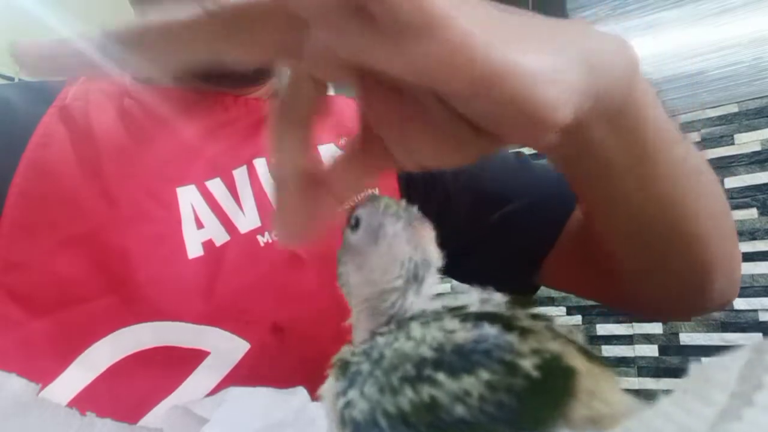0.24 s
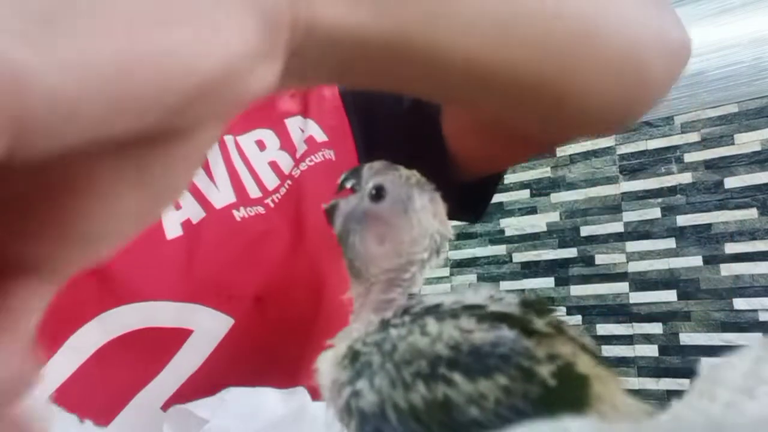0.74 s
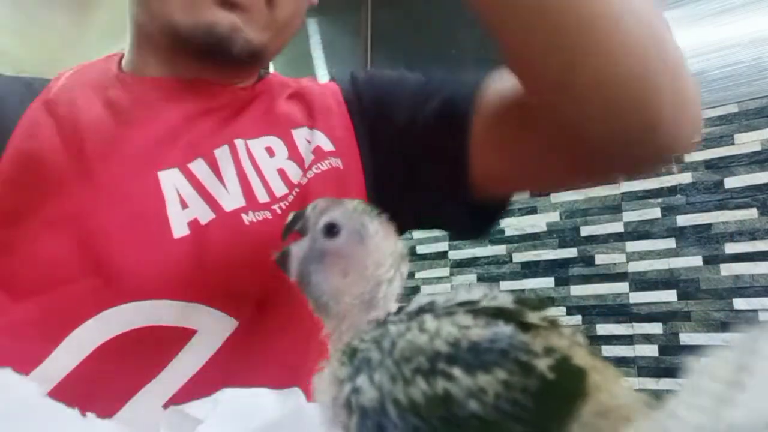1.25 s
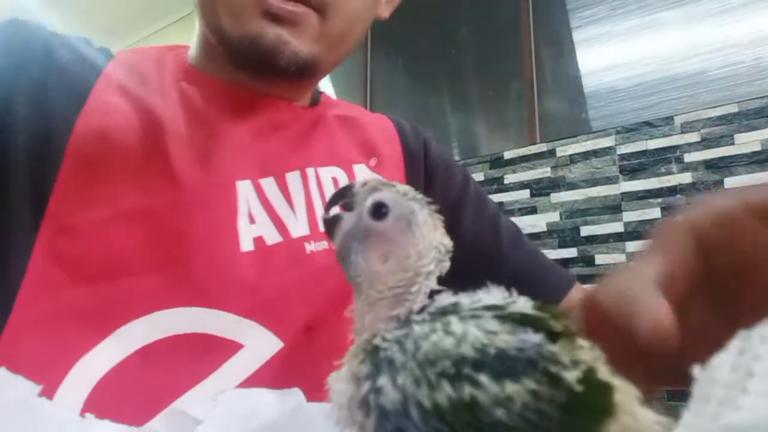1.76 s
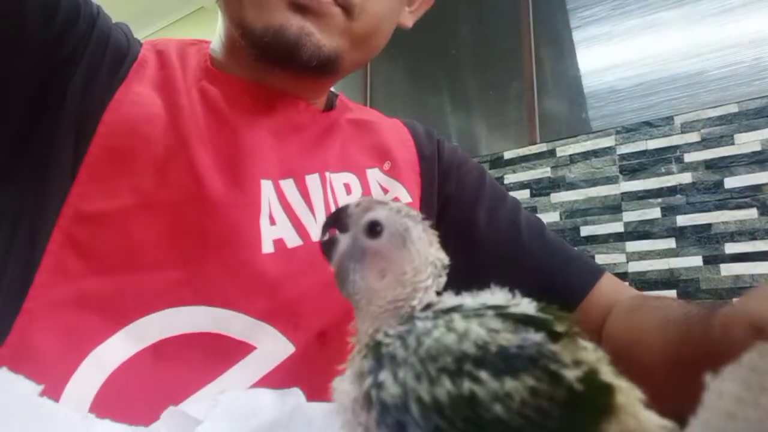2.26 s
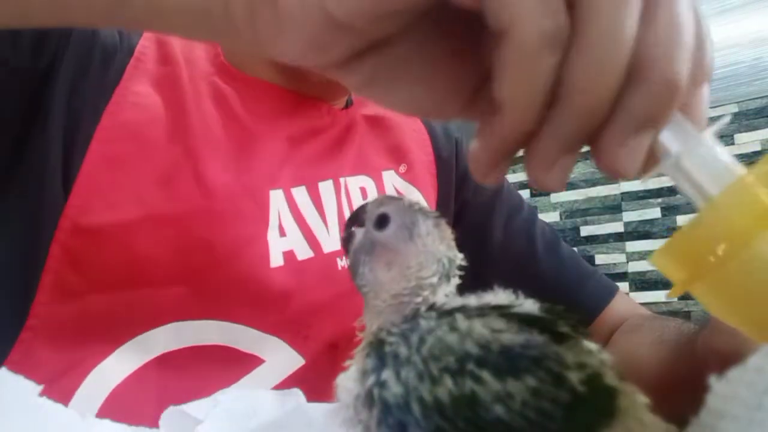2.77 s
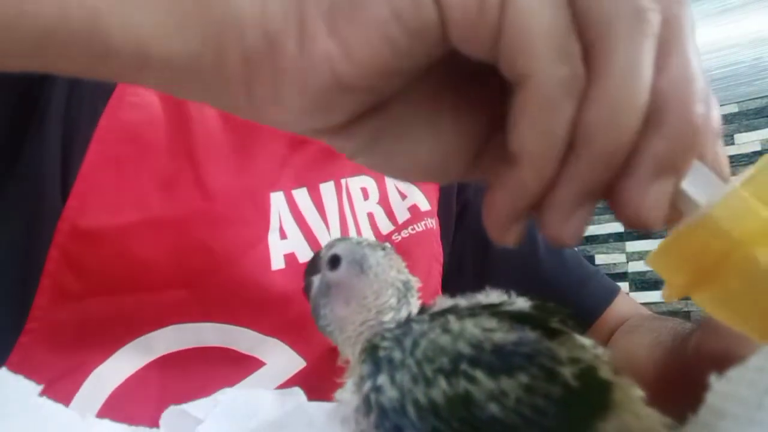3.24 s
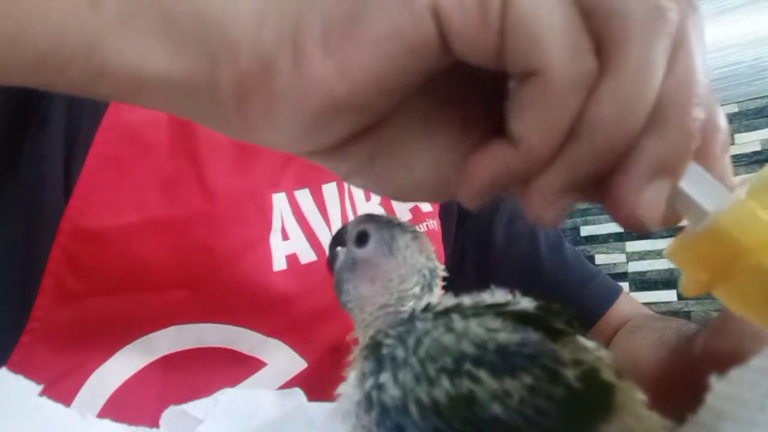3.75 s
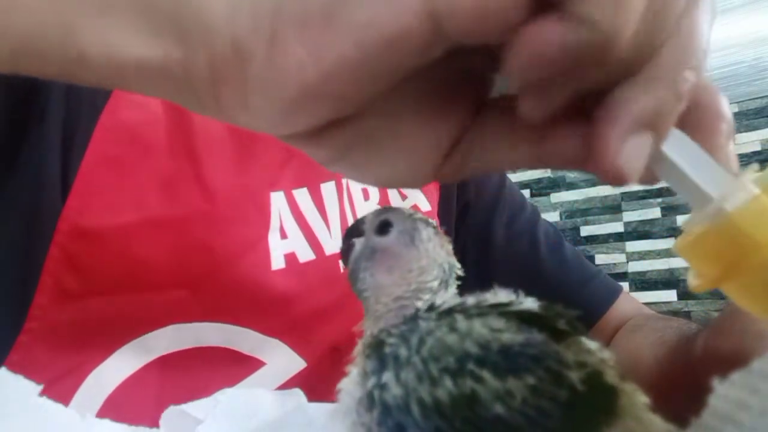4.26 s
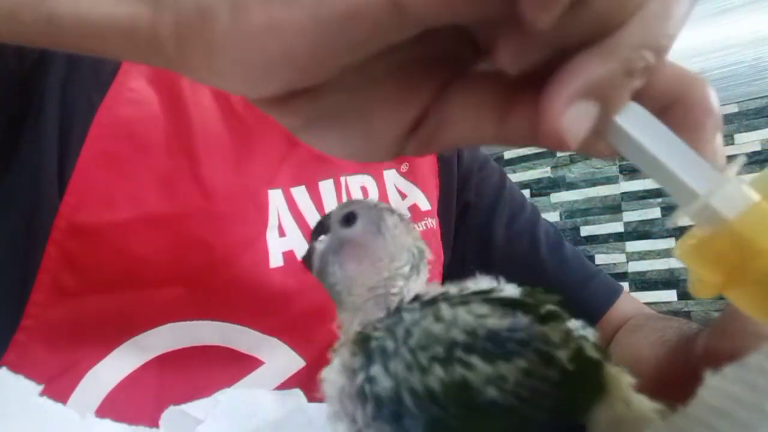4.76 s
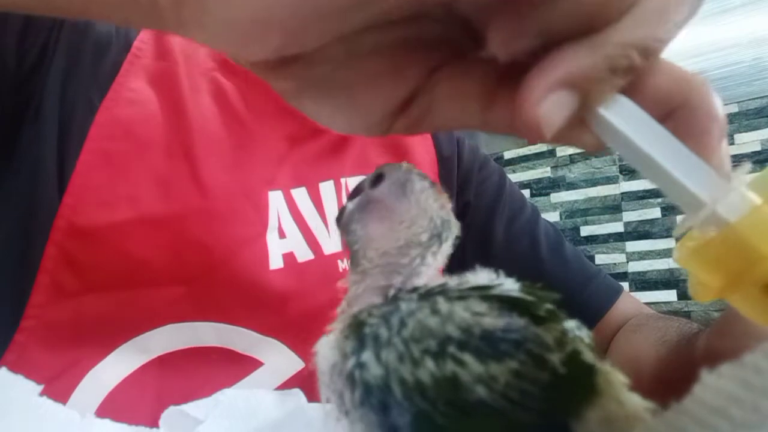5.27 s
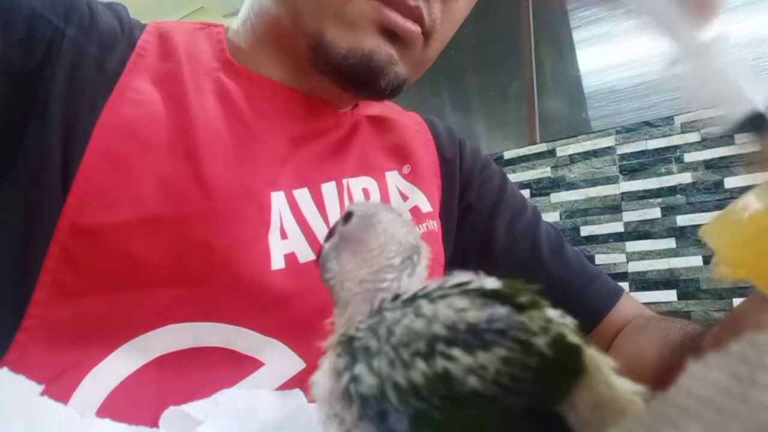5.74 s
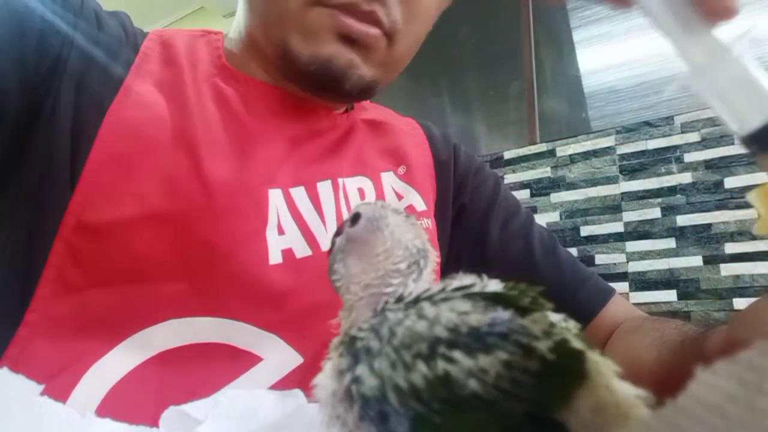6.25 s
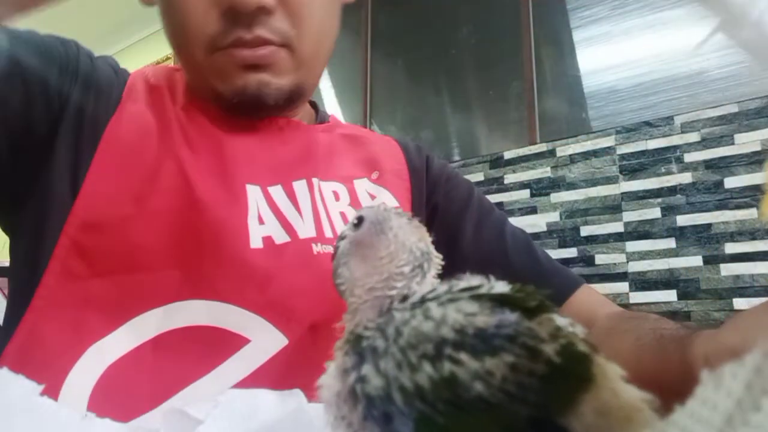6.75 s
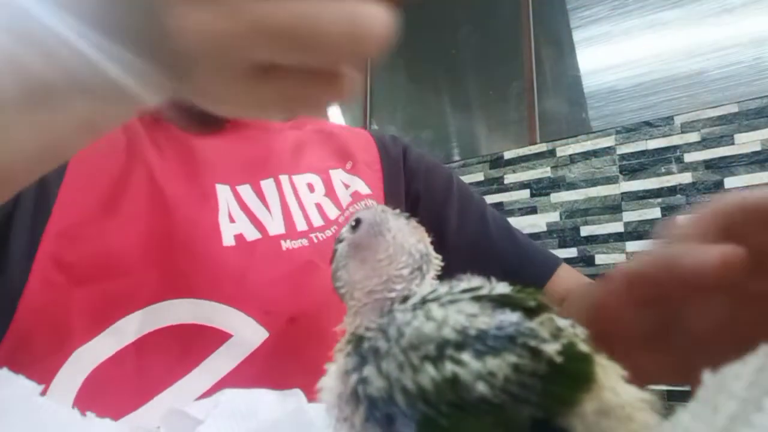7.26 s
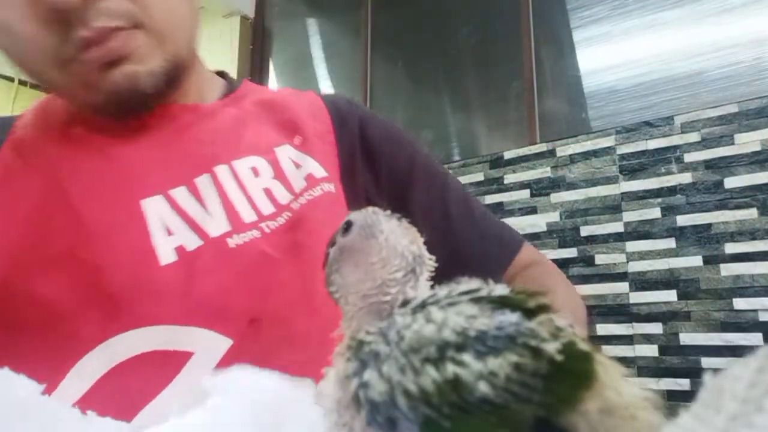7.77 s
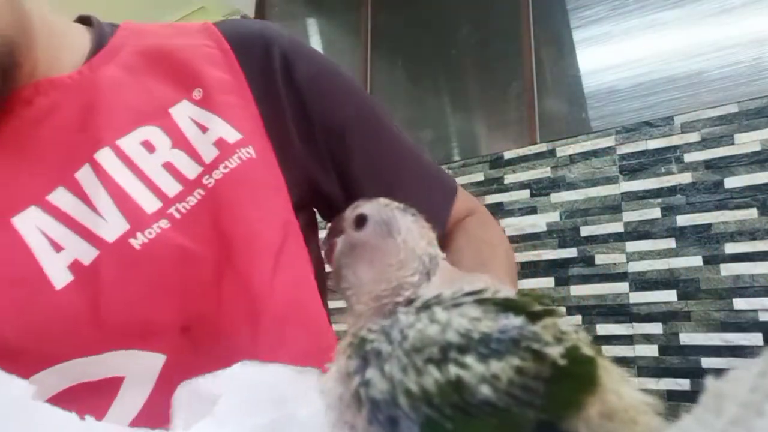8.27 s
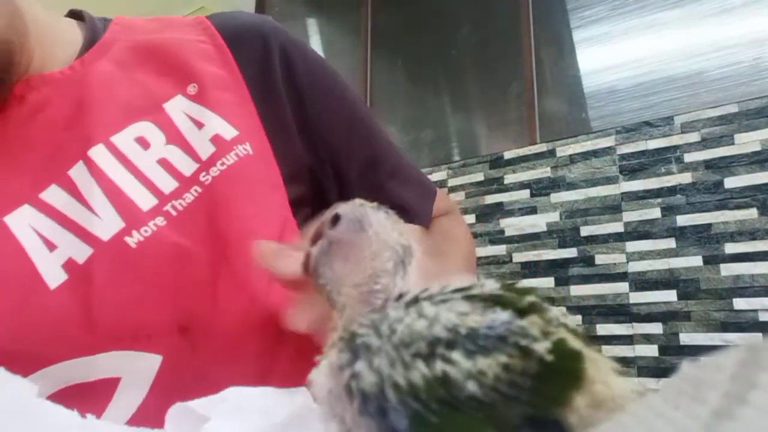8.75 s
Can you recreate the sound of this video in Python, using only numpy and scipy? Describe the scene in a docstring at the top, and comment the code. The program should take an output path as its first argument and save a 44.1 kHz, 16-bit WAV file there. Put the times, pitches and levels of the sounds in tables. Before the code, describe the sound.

Rapid, harsh, pulsing chick chirps come in bursts in a tiled room, answered by quick mouth clucks over soft hiss and faint cloth rustle.

```python
"""Under soft room noise and faint far tones, a parrot chick begs close to the microphone in a tiled room:
first a bout of fast, raspy chirps, each a trill of swooping pips with a thin squeak now and then.
After a pause with one tongue cluck from the keeper comes a second bout, then a run of clucks, then a short
third bout. Most chirps end on a falling note. Cloth, feathers and hands brush softly in between, and the
recorder's gain control ducks the room noise under loud sounds."""
import sys
import numpy as np
from scipy import signal
from scipy.fft import rfft, irfft, next_fast_len
from scipy.io import wavfile
from scipy.ndimage import uniform_filter1d

SR = 44100
rng = np.random.default_rng(int(sys.argv[2]) if len(sys.argv) > 2 else 0)


def pcm_store(signal):
    """Save signal as 16-bit PCM."""
    levels = np.round(np.clip(np.atleast_2d(signal), -1, 1) * 32767)
    wavfile.write(sys.argv[1], SR, levels.astype(np.int16).T)


N = 397336
T = np.arange(N) / SR


def from_db(db):
    """Decibels to gain."""
    return 10 ** (np.asarray(db) / 20)


def rms_one(x):
    """Scale to unit rms."""
    return x / np.sqrt(np.mean(x ** 2) + 1e-20)


def at_hz(points, hz, axis=1):
    """Read a column of a table on a log-frequency axis."""
    points = np.array(points)
    return np.interp(np.log(np.maximum(hz, 1)), np.log(points[:, 0]), points[:, axis])


def wander(rate, size):
    """Random curve around 0: normal draws of spread 1, `rate` a second, joined by straight lines."""
    place = np.arange(size) * rate / SR
    count = int(place[-1]) + 2
    return np.interp(place, np.arange(count), rng.standard_normal(count))


def band(x, low_hz, high_hz):
    """Band-pass, second-order on each side."""
    edges = [low_hz, min(high_hz, SR / 2 - 10)]
    return signal.sosfilt(signal.butter(2, edges, "band", fs=SR, output="sos"), x)


def high_pass(x, hz):
    """Fourth-order high-pass."""
    return signal.sosfilt(signal.butter(4, hz, "high", fs=SR, output="sos"), x)


def resonate(x, hz, width_hz):
    """One resonance that keeps the power of white noise."""
    r = np.exp(-np.pi * width_hz / SR)
    feed = np.array([1, 0, -1]) * np.sqrt((1 - r * r) / 2)
    return signal.lfilter(feed, [1, -2 * r * np.cos(2 * np.pi * hz / SR), r * r], x)


def coloured(spectrum, size):
    """Noise of a given spectrum, rms 1."""
    hz = np.arange(size // 2 + 1) * SR / size
    white = rfft(rng.standard_normal(size))
    return rms_one(irfft(white * from_db(at_hz(spectrum, hz)), size))


def add(out, s, sound):
    """Mix a sound in at time s."""
    start = round(s * SR)
    part = sound[max(-start, 0):max(N - start, 0)]
    out[max(start, 0):max(start, 0) + len(part)] += part


# spectral shape of the room's air noise: (f/Hz, relative level/dB per Hz)
AIR_SPECTRUM = [(25, -18), (70, -8), (140, -6.5), (320, -11), (414, -13.5), (527, 2.5), (900, 2),
                (1300, 4.5), (1700, -1.5), (2300, -5), (3400, -10.5), (5000, -11), (6400, -6.5),
                (8700, -19), (12000, -23.5), (15800, -23.5)]
# swells of the low rumble: (t/s, level/dB)
RUMBLE_LEVEL = [(0, -63), (1.9, -63), (2.5, -81), (3.3, -66), (4.1, -62.5), (5.2, -67), (9, -75)]
AIR_LOW_DB, AIR_HIGH_DB = -47, -43.5   # rms of the air noise below and above about 2 kHz
FIZZ_FLICKER_DB, FIZZ_TURNS_PER_S = 3, 12   # flicker of the top octave; turns of all the upper octaves


def room_noise(patchy_db=1.8):
    """Soft air noise over a low rumble; each octave swells a little on its own, and the noise above about 8 kHz
    flickers."""
    size = next_fast_len(N, True)
    spectrum = rfft(coloured(AIR_SPECTRUM, size))
    hz = np.arange(size // 2 + 1) * SR / size
    dull, bright = 0, 0
    for centre in 90 * 2 ** np.arange(8):
        # neighbouring octaves crossfade into each other
        share = np.maximum(1 - np.abs(np.log2(np.clip(hz, 90, 11520) / centre)), 0)
        octave = irfft(spectrum * share, size)[:N]
        if centre < 2000:
            dull += octave * from_db(patchy_db * wander(14, N))
        else:
            flicker_db = FIZZ_FLICKER_DB if centre > 8000 else 1.1
            bright += octave * from_db(flicker_db * wander(FIZZ_TURNS_PER_S, N))
    air = from_db(AIR_LOW_DB) * rms_one(dull) + from_db(AIR_HIGH_DB) * rms_one(bright)
    drone = rms_one(band(rng.standard_normal(N), 60, 98))
    return air + from_db(np.interp(T, *np.transpose(RUMBLE_LEVEL))) * drone


# faint far tones: (middle t/s, length/s, f/Hz, peak level/dB)
DISTANT_TONES = [(.36, 0.48, 1124, -48.5), (1.535, 0.38, 1109, -49.5), (4.38, .14, 1760, -52),
                 (7.788, 0.48, 986, -48)]


def far_tones():
    """Thin, slightly wavering sine tones that come and go in the distance."""
    out = np.zeros(N)
    waver_hz = 5 * wander(30, N)
    for s, length, hz, db in DISTANT_TONES:
        swell = np.exp(-(2 * (T - s) / length) ** 4)
        out += from_db(db) * swell * np.sin(2 * np.pi * np.cumsum(hz + waver_hz) / SR)
    return out


# the clearest brushes of cloth, feathers and hands: (middle t/s, length/s, level/dB, centre f/Hz)
CLEAR_BRUSHES = [(.1, 0.43, -54, 546), (1.95, 0.23, -47, 1980), (2.15, 0.11, -54, 437),
                 (2.67, 0.02, -46.5, 602), (2.83, 0.22, -56.5, 303), (3.023, 0.013, -42, 764),
                 (3.072, 0.12, -42, 5800), (3.69, 0.089, -55, 208), (4.2, 0.15, -50, 1850),
                 (4.95, 0.57, -56, 420), (5.82, 0.46, -54.5, 273), (6.96, 0.097, -39.5, 376),
                 (7.18, 0.24, -56, 154), (7.349, 0.25, -50.5, 497), (8.03, 0.53, -52, 585),
                 (8.278, 0.2, -53, 355), (7.92, 0.054, -49, 890), (8.273, 0.082, -43, 6000),
                 (8.42, 0.4, -45, 1810)]
# level of the keeper's softly stirring sleeves: (t/s, level/dB)
SLEEVE_LEVEL = [(0, -84), (1.4, -67.5), (2.9, -66), (4.2, -60), (5.2, -60.5), (7.1, -55), (7.7, -69),
                (8.4, -60.5), (9, -61.5)]
STIRS_PER_S, STIR_S = 14, 0.12   # rate; mean length of one stir
STIR_LOW_HZ, STIR_HIGH_HZ = 169.5, 520   # range of their centres


def rustles(spread=1.157):
    """Grainy brushes, each a short swell of narrow noise: some clear ones over a random low stirring."""
    out, t = np.zeros(N), T[:SR] - .5
    brushes = list(CLEAR_BRUSHES)
    for k, (when, long, high) in enumerate(rng.random((int(STIRS_PER_S * N / SR), 3))):
        s = (k + when) / STIRS_PER_S
        db = np.interp(s, *np.transpose(SLEEVE_LEVEL))
        centre_hz = STIR_LOW_HZ * (STIR_HIGH_HZ / STIR_LOW_HZ) ** high
        brushes.append((s, STIR_S * (.5 + long), db, centre_hz))
    for s, length, db, hz in brushes:
        grain = from_db(2.5 * wander(120, SR))
        brush = rms_one(grain * band(rng.standard_normal(SR), hz / spread, hz * spread))
        add(out, s + t[0], from_db(db) * np.exp(-(2 * t / length) ** 2) * brush)
    return out


# near surfaces: (delay t/s, gain as a share of the direct sound)
NEAR_SURFACES = [(.0036, 0.015), (.0062, 0.013), (0.012, .2)]
# reverberant tail: (f/Hz, level/dB, t60/s)
REVERB = [(191, 30, 1), (394, -2, 0.45), (605, -8, 0.24), (860, -20.5, 0.18), (1690, -19, 1),
          (2280, -17.5, 1), (2800, -20, 0.8), (3340, -20, 0.47), (3700, -12, 0.37), (3990, -15.5, .7),
          (4280, -7.5, 0.73), (4520, -11.5, 0.41), (4930, -14.5, 0.58), (5660, -0.5, 0.23),
          (5900, -9.5, 0.76), (7300, -5, 0.27), (9200, -10, 0.33), (13160, -13, 0.31)]


def room(x, gap_s=0.0023):
    """A few near echoes, and a diffuse tail that builds up after a short gap and dies band by band."""
    t = T[:SR]
    response, edges = np.zeros(SR), np.geomspace(140, 17000, 60)
    for low, high in zip(edges, edges[1:]):
        hz = np.sqrt(low * high)
        decay = from_db(-60 * t / at_hz(REVERB, hz, axis=2)) * (1 - np.exp(-(t / gap_s) ** 2))
        decay /= np.sqrt(np.sum(decay ** 2))
        response += from_db(at_hz(REVERB, hz)) * band(rng.standard_normal(SR), low, high) * decay
    for delay, share in NEAR_SURFACES:
        response[round(delay * SR)] += share
    return x + signal.fftconvolve(x, response)[:N]


# a hollow object nearby: (f/Hz, t60/s, gain at resonance as level/dB)
HOLLOW_OBJECT = (382, 0.2, 21.3)


def sympathetic(x):
    """One narrow resonance, set going by the low part of the keeper's clucks and their echoes."""
    hz, t60, db = HOLLOW_OBJECT
    r = from_db(-60 / (t60 * SR))
    feed = np.array([1, 0, -1]) * (1 - r * r) / 2   # unit gain at the peak
    return from_db(db) * signal.lfilter(feed, [1, -2 * r * np.cos(2 * np.pi * hz / SR), r * r], x)


# tongue clucks: (t/s, level/dB, mouth resonance f/Hz midway through its fall,
# hollow low resonance level/dB, upper resonance level/dB, both relative to the mouth, rise/s)
TONGUE_CLUCKS = [(2.515, -11.5, 790, -32, -39, 0.0019), (5.657, -16, 880, -2.5, -26, 0.00089),
                 (5.819, -3.5, 940, -4.5, -24, 0.0013), (5.957, 1.5, 982, -5, -30, 0.0013),
                 (6.091, 0, 974, -4, -35, 0.0013), (6.2167, -2.5, 978, -3.5, -40, 0.0016),
                 (6.3637, 1, 772, -12, -38, 0.0018), (6.5085, 1.5, 780, -8, -39, 0.0015),
                 (6.662, 2, 777, -8, -34, 0.0013), (6.801, 0, 765, -2.5, -39, 0.0014),
                 (6.934, -15.5, 734, 1, -30, 0.0035)]
# ring time of a mouth resonance at MOUTH_HZ; power by which a lower one rings longer
MOUTH_T60_S, MOUTH_HZ, MOUTH_DAMPING = 0.023, 940, 1.2
UPPER_MOUTH_HZ, UPPER_MOUTH_T60_S = 2850, 0.049   # this resonance stays put
SNAP_DB = -23   # snap of the tongue, relative to the ring


def clucks(sag=0.1, low_ratio=0.82, low_t60=0.022, edge_ratio=0.48):
    """The tongue snaps off the palate; three mouth resonances ring, the lower two sinking as it opens."""
    out, t = np.zeros(N), T[:SR // 10]
    for s, level_db, hz, hollow_db, upper_db, rise_s in TONGUE_CLUCKS:
        t60 = MOUTH_T60_S * (MOUTH_HZ / hz) ** MOUTH_DAMPING
        sinking_hz = hz * (1 + sag * (2 * np.exp(-t / 0.0067) - 1))
        phase = 2 * np.pi * np.cumsum(sinking_hz) / SR
        ring = np.sin(phase) * from_db(-60 * t / t60)
        ring += np.cos(low_ratio * phase) * from_db(hollow_db - 60 * t / low_t60)
        ring += np.sin(2 * np.pi * UPPER_MOUTH_HZ * t) * from_db(upper_db - 60 * t / UPPER_MOUTH_T60_S)
        snap = rms_one(band(rng.standard_normal(len(t)), 530, 4500)) * np.exp(-t / 0.004)
        cluck = ring * (1 - np.exp(-(t / rise_s) ** 2)) + from_db(SNAP_DB) * snap
        add(out, s, from_db(level_db) * high_pass(cluck, edge_ratio * hz))
    return out


# walls that throw the clucks back: (delay t/s, level/dB)
CLUCK_WALLS = [(.0098, -10), (.05, -25.5)]


def thrown_back(direct):
    """The direct sound plus one delayed, softer copy from each wall."""
    out = direct.copy()
    for delay, db in CLUCK_WALLS:
        add(out, delay, from_db(db) * direct)
    return out


# thin, pure squeaks between pips: (middle t/s, level/dB, f/Hz, half-length/s)
THIN_SQUEAKS = [(0.376, -19, 3850, 0.0045), (.381, -9, 7100, 0.0012), (.441, -5.5, 7040, 0.0012),
                (.483, -15, 5950, 0.0018), (0.504, -11, 5220, 0.0021), (0.726, -15, 5750, 0.0047),
                (0.868, -11.5, 6000, 0.0025), (0.903, -15, 5920, 0.0072), (1.099, -13, 4140, 0.0027),
                (1.135, -16, 4000, 0.0026), (4.467, -14, 7100, 0.0022), (4.477, -14, 6960, .002),
                (5.011, -16, 5770, 0.0025), (5.469, -10, 6350, 0.0052), (5.596, -15, 5850, 0.0027),
                (5.614, -15, 6070, 0.0054), (8.683, -10, 4500, 0.0027), (8.694, -17, 4520, .004)]
SQUEAK_FALL, SQUEAK_WAVER = .025, .012   # shares of the pitch


def squeaks():
    """The syrinx flips into near-pure whistles of a few milliseconds that sink a little."""
    out, t = np.zeros(N), np.arange(-SR // 50, SR // 50) / SR
    for s, level_db, hz, half_s in THIN_SQUEAKS:
        u = t / half_s
        bend = 1 - SQUEAK_FALL * np.tanh(u) + SQUEAK_WAVER * wander(700, len(t))
        whistle = np.sqrt(2) * np.exp(-u ** 4 / 2) * np.sin(2 * np.pi * np.cumsum(hz * bend) / SR)
        add(out, s + t[0], from_db(level_db) * whistle)
    return out


# colour of the chick's throat: (f/Hz, relative level/dB)
THROAT_COLOUR = [(1400, 15), (1900, -2.5), (2300, 5), (2800, 19.5), (3400, 11.5), (3750, 7), (4050, 11),
                 (4500, 8.5), (5000, 18), (5550, 2), (5950, 4.5), (6600, 9), (7200, 0.5), (8500, -12),
                 (9400, -7.5), (10400, -14.5), (11400, -8), (12500, -8), (13500, -13.5), (16000, -24)]
# resonances of throat and beak that turbulent air sets ringing: (f/Hz, width/Hz, level/dB)
RASP_RESONANCES = [(2190, 570, -6), (4080, 850, -3), (4530, 150, -5.5), (5840, 1260, -4.5),
                   (7360, 310, -18)]
JITTER, FLANK_ROUGH = .048, .6   # pitch jitter as a share; roughness where pressure is low
HISS_DB = -15.5   # turbulence at the beak, before the chirp's harshness is added


def pip(t, pitch_hz, pressure, glide, rough, low_db, beak_db, treble_db, dull_db=0, purity=0.55,
        low_hz=2000, beak_hz=5900):
    """A pulse of air through the syrinx: its tone grows rich at peak pressure, breaks up on the flanks."""
    unsteady = np.hypot(rough, FLANK_ROUGH * (1 - pressure))
    hz = pitch_hz * (1 + glide + JITTER * unsteady * wander(1900, len(t)))
    shimmer = 1 + .3 * unsteady * wander(2000, len(t))
    phase = 2 * np.pi * np.cumsum(hz) / SR
    k = np.arange(1, 10)[:, None]   # harmonics
    upper = np.maximum(k - 2, 0)
    partial_hz = k * pitch_hz * (1 + glide)
    # tongue and gape colour the tone but leave its level alone
    gape_db = low_db * np.exp(-((partial_hz - low_hz) / 900) ** 2)
    gape_db += beak_db * np.exp(-((partial_hz - beak_hz) / 1000) ** 2)
    gape_db += treble_db * np.clip((partial_hz - 6500) / 2000, 0, 1)
    chance_db = np.minimum(k / 2, 3) * rng.normal(0, 1, k.shape)
    gains = from_db(at_hz(THROAT_COLOUR, partial_hz) + gape_db - dull_db * upper + chance_db)
    gains *= partial_hz < SR / 2
    gains /= np.sqrt(np.average(np.sum(gains ** 2, axis=0), weights=pressure ** 2) / 2)
    # upper harmonics need more pressure
    partials = pressure ** (1 + purity * upper) * np.sin(k * phase + 2 * np.pi * rng.random(k.shape))
    tone = shimmer * np.sum(gains * partials, axis=0)
    # turbulent air, chopped by each opening of the syrinx, rings in the throat
    air = rng.standard_normal(len(t)) * (1 + np.cos(phase))
    rasp = np.zeros(len(t))
    for n, (mode_hz, width, db) in enumerate(RASP_RESONANCES):
        rasp += (-1) ** n * from_db(db) * resonate(air * unsteady * pressure, mode_hz, width)
    # harsh chirps hiss more
    hiss = from_db(HISS_DB + treble_db) * rms_one(band(air, 7300, 20000))
    return (tone + rasp + pressure ** 2 * hiss) / np.sqrt(1 + rough ** 2 / 2)


# chirps: (start t/s, length/s, harshness as treble level/dB)
CHIRP_TIMES = [(.37, 0.21, 6), (.57, 0.088, 4.5), (.715, .076, -8.5), (.85, 0.058, -4), (.973, 0.047, -7),
               (1.08, 0.062, -2.5), (1.195, 0.1, 5), (1.34, 0.093, 4.5), (4.453, 0.081, 0.5),
               (4.67, 0.065, 5.5), (4.825, 0.086, 3.5), (4.97, .063, 4), (5.095, 0.06, 4.5),
               (5.22, .056, 3), (5.335, .071, 4), (5.455, 0.051, 3), (5.576, 0.066, 4), (8.474, 0.16, 6.5),
               (8.67, 0.076, 7.5), (8.813, 0.079, 2), (8.945, 0.063, 5)]
# pips of the trills: (middle t/s, level/dB before the effort, f/Hz at the bottom of the swoop,
# roughness 0-1, low throat resonance level/dB, beak resonance level/dB)
TRILL_PIPS = [(0.379, -9.0, 1800.0, 0.3, -6.0, -7.0), (0.392, -8.5, 1880.0, 0.1, -7.0, -8.0),
              (0.408, -8.5, 1880.0, 0.1, -5.0, -1.0), (0.422, -8.0, 1880.0, 0.2, -6.0, -0.0),
              (0.439, -8.5, 1860.0, 0.5, -5.0, 1.0), (0.453, -11.0, 1860.0, 1.0, -3.0, -0.0),
              (0.47, -11.5, 1880.0, 0.8, -1.0, 3.0), (0.485, -9.5, 1940.0, 0.8, 1.0, 10.0),
              (0.502, -10.0, 1860.0, 0.9, -1.0, 8.0), (0.581, -13.5, 1760.0, 0.6, -1.0, 1.0),
              (0.593, -10.0, 1920.0, 0.1, -0.0, 4.0), (0.608, -11.5, 1980.0, 0.5, 0.0, 0.0),
              (0.627, -13.0, 2030.0, 0.1, -16.0, -8.0), (0.642, -14.0, 1940.0, 0.4, -2.0, -7.0),
              (0.658, -15.0, 1940.0, 0.6, -0.0, -5.0), (0.723, -11.5, 1920.0, 0.7, -1.0, 0.0),
              (0.734, -8.5, 2000.0, 0.5, -2.0, 0.0), (0.748, -13.5, 2150.0, 1.0, 4.0, -1.0),
              (0.765, -8.0, 2000.0, 0.2, -7.0, -2.0), (0.86, -9.0, 1880.0, 0.1, -2.0, 3.0),
              (0.878, -9.0, 2150.0, 0.4, 10.0, 11.0), (0.893, -9.5, 1800.0, 0.8, 3.0, 4.0),
              (0.906, -11.5, 1940.0, 0.7, 5.0, 8.0), (0.978, -11.0, 1940.0, 0.8, -3.0, -6.0),
              (0.99, -7.5, 2130.0, 0.2, 7.0, 5.0), (1.006, -8.0, 1920.0, 0.9, 2.0, -1.0),
              (1.088, -11.0, 1840.0, 1.0, -3.0, -11.0), (1.102, -9.0, 2150.0, 0.2, 9.0, -9.0),
              (1.121, -7.5, 1940.0, 0.3, -6.0, -9.0), (1.205, -10.5, 1750.0, 0.1, 1.0, 0.0),
              (1.222, -8.5, 1980.0, 0.3, -6.0, -7.0), (1.236, -11.0, 1920.0, 0.5, -3.0, -5.0),
              (1.257, -11.5, 1920.0, 0.7, 1.0, -4.0), (1.347, -11.5, 1800.0, 1.0, 1.0, -2.0),
              (1.357, -11.0, 2000.0, 0.9, -1.0, -2.0), (1.371, -10.5, 1920.0, 0.7, 0.0, 10.0),
              (1.381, -13.5, 2000.0, 0.3, -5.0, 1.0), (1.395, -11.5, 1900.0, 0.5, -2.0, -3.0),
              (4.461, -11.5, 1980.0, 0.4, 2.0, 1.0), (4.474, -11.5, 1860.0, 0.7, 2.0, 1.0),
              (4.491, -9.5, 1920.0, 0.1, -1.0, 4.0), (4.506, -9.0, 1960.0, 0.3, 0.0, 3.0),
              (4.521, -12.5, 1840.0, 0.3, 0.0, 3.0), (4.539, -13.0, 1980.0, 0.7, 3.0, 4.0),
              (4.555, -13.0, 2150.0, 1.0, 2.0, 1.0), (4.571, -12.5, 1920.0, 0.6, 2.0, 4.0),
              (4.588, -10.0, 2150.0, 1.0, 0.0, -0.0), (4.678, -11.0, 1860.0, 0.8, 1.0, 3.0),
              (4.693, -7.0, 1940.0, 0.1, -2.0, 5.0), (4.709, -8.0, 2000.0, 0.2, -1.0, 2.0),
              (4.724, -9.0, 1940.0, 0.2, -2.0, 4.0), (4.741, -11.0, 2000.0, 0.6, 1.0, 2.0),
              (4.835, -12.0, 1860.0, 0.5, 1.0, 3.0), (4.847, -8.0, 2030.0, 0.1, 0.0, -1.0),
              (4.862, -9.0, 1920.0, 0.1, -2.0, 5.0), (4.879, -10.5, 2030.0, 0.4, -1.0, -0.0),
              (4.975, -17.0, 1900.0, 0.3, 1.0, -1.0), (4.987, -9.0, 1920.0, 0.1, -3.0, -0.0),
              (5.003, -9.0, 1960.0, 0.2, -1.0, 0.0), (5.021, -10.0, 2000.0, 0.3, 1.0, -3.0),
              (5.105, -11.0, 2150.0, 1.0, 2.0, -0.0), (5.119, -10.0, 2100.0, 0.4, 1.0, -2.0),
              (5.134, -12.5, 2100.0, 0.6, 0.0, -2.0), (5.229, -16.5, 1940.0, 0.8, 1.0, -3.0),
              (5.244, -11.0, 2030.0, 0.7, 2.0, 0.0), (5.259, -12.0, 2050.0, 0.6, -2.0, -4.0),
              (5.345, -13.5, 1800.0, 0.3, 4.0, 1.0), (5.357, -11.0, 1960.0, 0.8, 2.0, -1.0),
              (5.374, -11.5, 1980.0, 0.8, -1.0, -0.0), (5.463, -11.5, 1880.0, 0.9, -1.0, 3.0),
              (5.474, -9.5, 2100.0, 0.5, -2.0, 7.0), (5.493, -10.0, 2100.0, 0.3, -4.0, 6.0),
              (5.579, -17.5, 1920.0, 0.9, 2.0, 6.0), (5.588, -9.0, 1900.0, 0.1, -4.0, 6.0),
              (5.604, -9.5, 1940.0, 0.2, -4.0, 7.0), (5.622, -9.5, 2030.0, 0.2, -3.0, 6.0),
              (5.64, -11.0, 1920.0, 0.2, -2.0, 7.0), (8.478, -18.5, 1900.0, 0.4, 2.0, -4.0),
              (8.486, -13.0, 1980.0, 1.0, 2.0, -1.0), (8.502, -12.0, 1900.0, 0.2, -1.0, -0.0),
              (8.518, -12.5, 1920.0, 0.3, 0.0, -0.0), (8.536, -11.5, 2050.0, 0.5, 1.0, 3.0),
              (8.55, -12.0, 1960.0, 0.7, 1.0, 1.0), (8.565, -12.5, 2050.0, 1.0, 2.0, 0.0),
              (8.583, -11.5, 2150.0, 0.7, 2.0, -3.0), (8.6, -14.0, 2130.0, 1.0, 2.0, 0.0),
              (8.674, -15.0, 1920.0, 1.0, -2.0, -2.0), (8.682, -11.5, 2150.0, 0.6, 3.0, -11.0),
              (8.698, -10.5, 2030.0, 1.0, -1.0, -4.0), (8.715, -13.0, 1980.0, 0.9, 4.0, 1.0),
              (8.731, -13.0, 2030.0, 0.8, 0.0, -6.0), (8.823, -9.0, 1940.0, 0.1, -5.0, -4.0),
              (8.837, -8.5, 1960.0, 0.1, -6.0, -3.0), (8.853, -10.0, 2030.0, 0.4, -4.0, -8.0),
              (8.869, -11.0, 2030.0, 0.5, -4.0, -5.0), (8.954, -15.0, 1760.0, 0.3, 1.0, 3.0),
              (8.966, -12.0, 1900.0, 0.4, 1.0, 0.0), (8.982, -11.0, 2080.0, 1.0, 2.0, -2.0),
              (9.001, -12.0, 2000.0, 0.4, 2.0, -1.0)]
# falling notes that close chirps: (t/s, level/dB, f/Hz before the fall)
FALLING_NOTES = [(0.519, -17, 1734), (0.678, -27, 1940), (0.785, -13, 1904), (0.914, -14, 1874),
                 (1.026, -8.5, 1842), (1.14, -13.5, 1764), (1.272, -24, 1834), (1.411, -20, 1660),
                 (4.603, -12.5, 1990), (4.762, -21.5, 1700), (4.896, -10.5, 1880), (5.037, -15.5, 1725),
                 (5.153, -14.5, 1930), (5.278, -15, 1785), (5.392, -16.5, 1790), (5.506, -16.5, 1885),
                 (5.652, -19, 1735), (8.751, -18, 1690), (8.884, -15.5, 1856)]
PIP_HALF_S, PIP_SHRINK = 0.0052, 0.421   # typical half-length of a first pip; share lost by the chirp's end
SWING_FIRST, SWING_LAST = .25, .5   # typical depth of the swoop, first and last pip, as a share of pitch
UPTURN = .45   # share of the swoop that the pitch climbs back
ONSET_S = 0.0054   # the syrinx opens abruptly at the start of a chirp
EFFORT_DB, EFFORT_RISE_S = -0.5, 0.025   # the level eases slightly early in each chirp
CLOSING_HALF_S, CLOSING_FALL, CLOSING_ROUGH = 0.003, .16, .55   # fall as a share of pitch
CLOSING_BEAK_DB, CLOSING_LOW_DB = -5, -0.5   # beak and low throat resonances
CLOSING_DULL_DB = 2   # lost per harmonic above the second


def chick(low_edge_hz=1500):
    """Trills of ever shorter, deeper pips that swoop down and part-way up; most end on a falling note."""
    out, t = np.zeros(N), np.arange(-SR // 50, SR // 50) / SR
    for s, level_db, hz, rough, low_db, beak_db in TRILL_PIPS:
        start, length, harsh_db = [chirp for chirp in CHIRP_TIMES if chirp[0] < s - t[0]][-1]
        progress = min((s - start) / length, 1)
        half_s = PIP_HALF_S * (1 - PIP_SHRINK * progress) * np.exp(rng.normal(0, 0.1034))
        u = t / half_s
        opening = np.clip((s + t - start) / ONSET_S, 0, 1)
        pressure = np.exp(-np.abs(u) ** 2.6 * .55) * opening
        swing = (SWING_FIRST + (SWING_LAST - SWING_FIRST) * progress) * rng.uniform(.6, 1.4)
        glide = swing * np.where(u < 0, 1, UPTURN) * np.tanh(u ** 4 / 5)
        effort_db = EFFORT_DB * (1 - np.exp(-max(s - start, 0) / EFFORT_RISE_S))
        sound = pip(t, hz, pressure, glide, rough, low_db, beak_db, harsh_db)
        add(out, s + t[0], from_db(level_db + effort_db) * sound)
    # the closing note starts quickly and sinks as the air runs out
    u = t / CLOSING_HALF_S
    pressure = np.exp(-np.where(u < 0, u ** 2, u ** 2 / 3))
    glide = -CLOSING_FALL * np.tanh(np.maximum(u + .5, 0) ** 2 / 9)
    for s, level_db, hz in FALLING_NOTES:
        note = pip(t, hz, pressure, glide, CLOSING_ROUGH, CLOSING_LOW_DB, CLOSING_BEAK_DB,
                   treble_db=0, dull_db=CLOSING_DULL_DB)
        add(out, s + t[0], from_db(level_db) * note)
    return high_pass(out, low_edge_hz)


def scene():
    """Chick and keeper sound in the room, over its noise, the far tones and the rustling."""
    background = room_noise() + far_tones() + rustles()
    tongue = thrown_back(clucks())
    voices = room(chick() + squeaks() + tongue)
    return (background + sympathetic(tongue) + voices)[None]


def gain_control(x, threshold_db=-28, slope=0.4, release_db_per_s=380, attack_s=0.0064, ahead_s=0.0065):
    """Loud moments pull the gain down, starting just ahead of them; it recovers soon afterwards."""
    level_db = 10 * np.log10(np.maximum(uniform_filter1d(x ** 2, size=128), 1e-12))
    # hold each peak, then let it sink at the release rate
    held_db = np.maximum.accumulate(level_db + release_db_per_s * T) - release_db_per_s * T
    r = np.exp(-1 / (attack_s * SR))
    cut_db = signal.lfilter([1 - r], [1, -r], slope * np.maximum(held_db - threshold_db, 0))
    return x * from_db(-np.interp(T + ahead_s, T, cut_db))


CUTOFF_HZ = 15900


def record(dry):
    """Gain control, then a steep low-pass cuts the top."""
    low_pass = signal.ellip(10, .2, 80, CUTOFF_HZ, fs=SR, output="sos")
    return signal.sosfilt(low_pass, gain_control(dry[0]))[None]


dry = scene()
out = record(dry)
pcm_store(out)
```